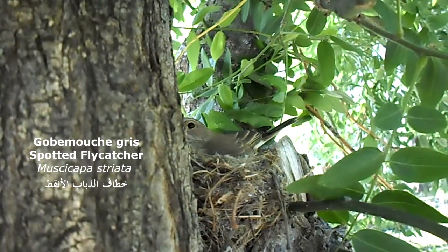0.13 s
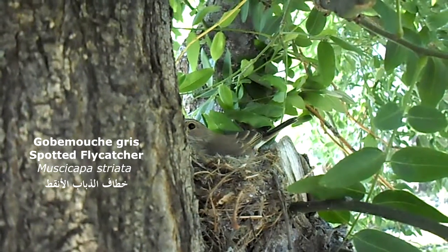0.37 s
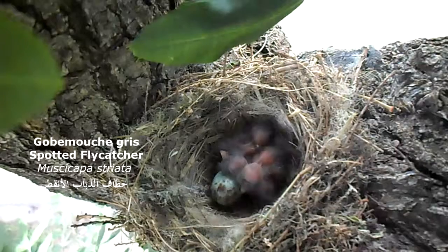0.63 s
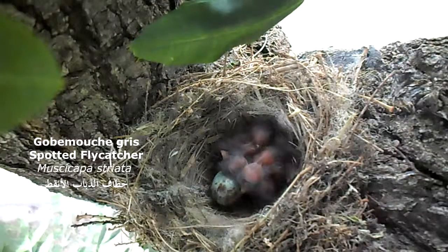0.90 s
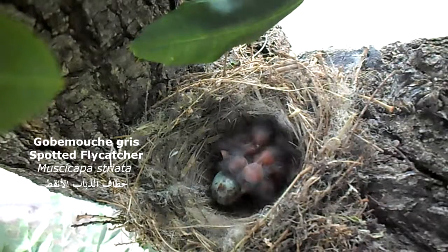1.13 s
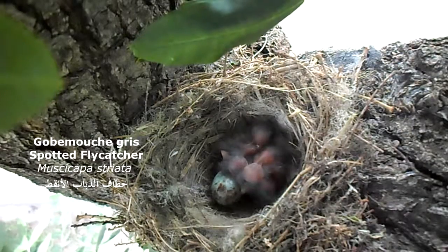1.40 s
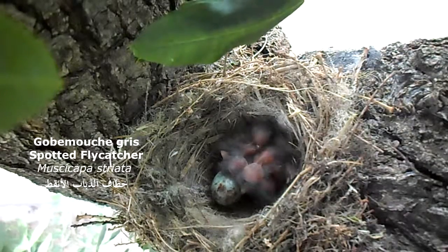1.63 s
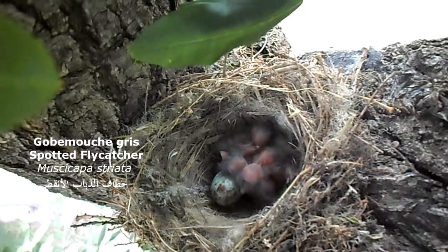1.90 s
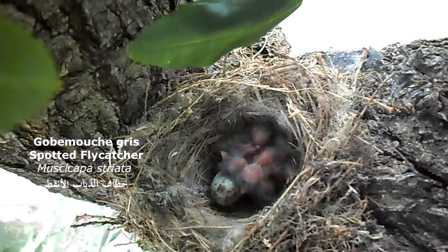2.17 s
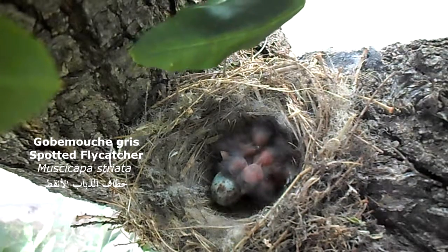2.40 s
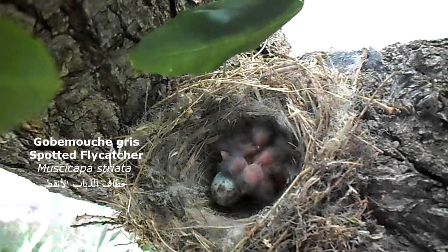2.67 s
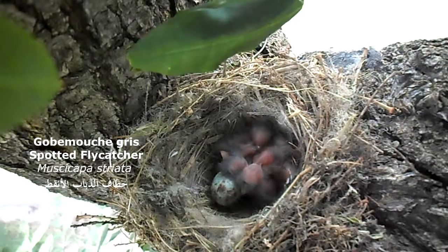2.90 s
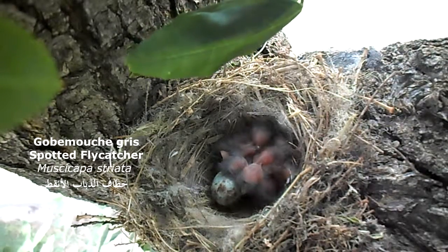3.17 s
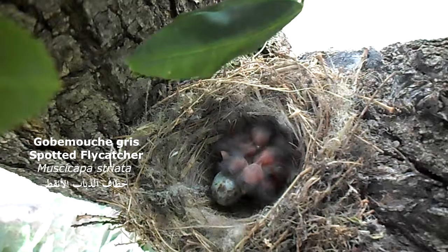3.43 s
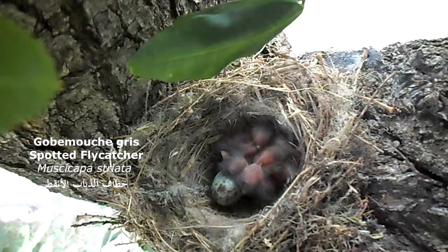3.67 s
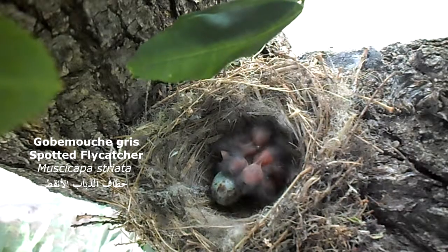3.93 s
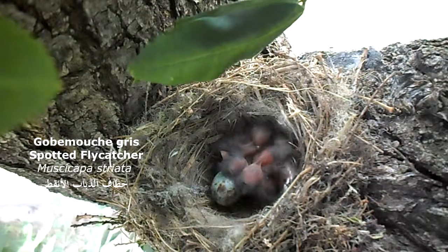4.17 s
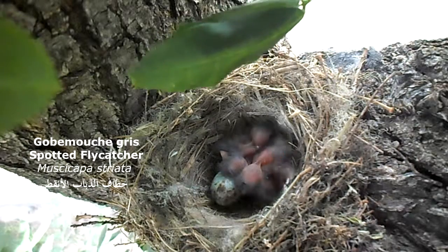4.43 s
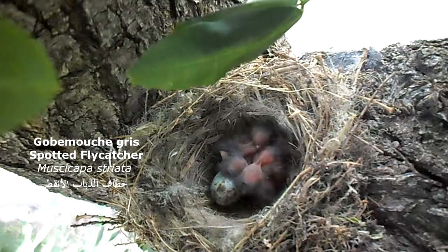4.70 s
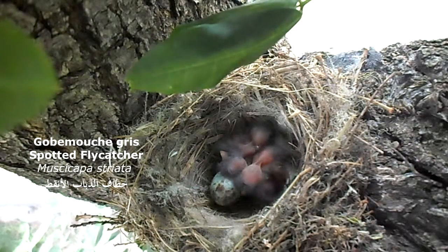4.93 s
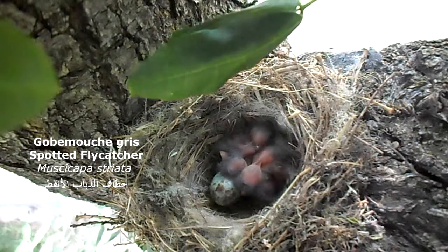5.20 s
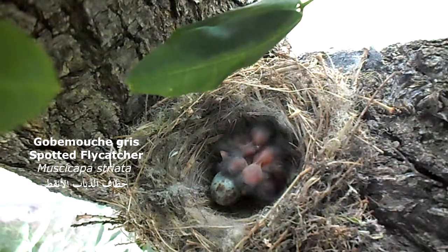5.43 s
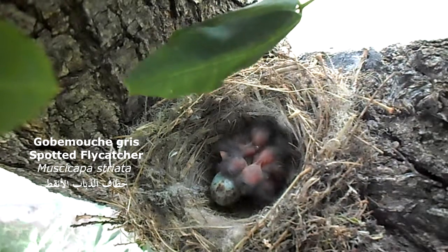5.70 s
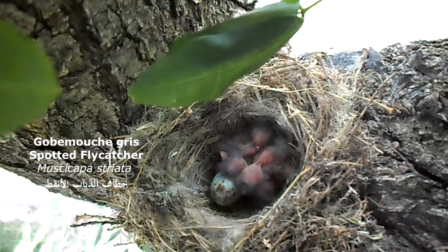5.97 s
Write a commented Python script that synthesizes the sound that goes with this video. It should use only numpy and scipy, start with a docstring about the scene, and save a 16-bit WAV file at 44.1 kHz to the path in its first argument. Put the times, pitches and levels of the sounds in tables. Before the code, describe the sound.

Small birds chirp, trill and seep thinly among trees while low wind buffets the microphone; a brief traffic roar cuts off at the start.

```python
"""Trees around a nest: small birds give thin glides, warbles, buzzy falling calls, trills, slurs and high seeps.
Bird notes are near sines on pitch curves, with scattered echoes from the trees.
Wind (low noise and pressure dips) buffets the microphone over a steady coloured-noise hiss.
Twigs tick (noise puffs) and wood knocks (damped sines) now and then.
A distant traffic roar (noise) with a low drone (wavering sine) fills the first half second and stops abruptly."""
import sys
import numpy as np
from scipy import signal
from scipy.fft import rfft, irfft
from scipy.io import wavfile
from scipy.ndimage import uniform_filter1d

SR = 44100
rng = np.random.default_rng(int(sys.argv[2]) if len(sys.argv) > 2 else 0)


def voltage_ratio(level):
    """Linear amplitude factor for a level in decibels (scalar or array-like)."""
    return 10 ** (np.asarray(level, float) / 20)


def bounce(signal):
    """Save signal as a 16-bit WAV file at the path given by the first command-line argument."""
    frames = np.transpose(np.atleast_2d(signal))
    limited = np.clip(frames, -1, 1)
    pcm = np.round(limited * 32767).astype(np.int16)
    wavfile.write(sys.argv[1], SR, pcm)


N = 268172  # samples


def evened(x):
    """Scales to rms 1."""
    return x / np.sqrt(np.mean(x ** 2) + 1e-20)


def add(mix, start_s, sound):
    """Adds a sound into the mix in place, clipped at the mix's end."""
    part = mix[round(start_s * SR):][:len(sound)]
    part += sound[:len(part)]


def wander(count, hz):
    """Random curve of rms about 1: straight lines between hz random knots a second, 500 at most."""
    knots = rng.standard_normal(int(count * 500 / SR) + 9)
    return np.interp(np.arange(count) * min(hz, 500) / SR, np.arange(len(knots)), knots)


def noise(spectrum, size, patchy_db):
    """Noise of rms 1 from random short-time spectra of a given colour, with drifting patches."""
    hz = np.fft.rfftfreq(size, 1 / SR)
    frames = N // (size // 4) + 5
    real, imag, patches = rng.standard_normal((frames, len(hz), 3)).T
    patches = uniform_filter1d(patches, size=10, axis=0)  # across frequency
    patches = evened(uniform_filter1d(patches, size=8, axis=1))  # across time
    point_hz, point_db = np.transpose(spectrum)
    colour_db = np.interp(np.log(hz + 1), np.log(point_hz + 1), point_db, left=-90, right=-90)
    spectra = (real + 1j * imag) * voltage_ratio(colour_db[:, None] + patchy_db * patches)
    return evened(signal.istft(spectra, nperseg=size, noverlap=size - size // 4)[1][:N])


# Hiss colour. Each row: frequency in Hz, relative density in dB per Hz.
HISS_COLOUR = [(90, -12.5), (150, -1), (250, -8), (500, -9), (800, -13.5), (1300, -19), (2500, -22),
               (3500, -22), (5000, -24.5), (7000, -25), (7700, -21), (8900, -21), (9700, -26),
               (10400, -34.5), (11200, -57)]


def hiss():
    """Steady coloured noise, its level almost still."""
    level_db = -56.5 + 0.043 * wander(N, 2.6)
    return voltage_ratio(level_db) * noise(HISS_COLOUR, size=1024, patchy_db=0.66)


# Wind level curves. Each row: time in seconds, deep buffet level in dB, upper buffet level in dB.
GUSTS = [(0, -44.5, -51), (.5, -52, -52.5), (1.0, -53, -54.5), (1.45, -45, -56), (1.8, -52, -58),
         (2.1, -40, -52), (2.38, -44.5, -52.5), (2.55, -36, -45.5), (2.96, -41, -46.5), (3.12, -41, -53),
         (3.45, -42.5, -48.5), (3.8, -47, -57.5), (4.12, -46.5, -48.5), (4.45, -45, -56),
         (4.74, -46.5, -54), (4.86, -41, -47.5), (5.4, -37, -46.5), (5.65, -39, -50.5), (5.95, -36, -53),
         (6.07, -32.5, -36)]
# Colours of the two layers. Each row: frequency in Hz, relative density in dB per Hz.
DEEP_COLOUR = [(8, -25), (22, 2.5), (45, -6.5), (70, -9), (120, -42)]
UPPER_COLOUR = [(35, 0.5), (65, 1), (100, -4.5), (160, -15), (300, -30), (600, -66)]


def buffets():
    """Lumpy low pressure swings at the microphone: two noise layers lifted by the same eddies."""
    s, deep_db, upper_db = np.transpose(GUSTS)
    t = np.arange(N) / SR
    eddies = wander(N, 24)
    deep = voltage_ratio(np.interp(t, s, deep_db) + 2.5 * eddies) * noise(DEEP_COLOUR, size=8192, patchy_db=0.5)
    upper = voltage_ratio(np.interp(t, s, upper_db) + 2.0 * eddies) * noise(UPPER_COLOUR, size=4096, patchy_db=1)
    return deep + upper


# Sudden wind puffs. Each row: start in seconds, depth of the dip in dB.
PUFFS = [(1.918, -39), (2.679, -37), (2.801, -33), (2.835, -29), (2.932, -31.5), (4.826, -33),
         (4.954, -31.5), (5.782, -33), (6.048, -32)]
PUFF_HALF_WIDTH_S = 0.0029


def puffs():
    """Puffs that suck at the capsule: one pressure dip between two positive shoulders."""
    out = np.zeros(N)
    u = np.arange(SR // 20) / SR / PUFF_HALF_WIDTH_S - 3
    dip = (u ** 2 - 1) * np.exp(-.5 * u ** 2)
    for start_s, db in PUFFS:
        add(out, start_s, voltage_ratio(db) * dip)
    return out


# Traffic roar colour. Each row: frequency in Hz, relative density in dB per Hz.
ROAR_COLOUR = [(90, -32), (150, -3), (200, -5.5), (500, -2), (880, -4), (1400, -1), (1900, -7.5),
               (3200, -15.5), (9000, -22), (11000, -42)]
ROAR_END_S, DRONE_END_S = 0.488, 0.528
DRONE_HZ = 43.13  # mean


def traffic():
    """A grainy noise roar and a drone, a sine wavering in pitch and level, that end abruptly."""
    t = np.arange(N) / SR
    roar = voltage_ratio(-53 + 0.87 * wander(N, 59.6)) * noise(ROAR_COLOUR, size=1024, patchy_db=0.7)
    turns = np.cumsum(DRONE_HZ * (1 + 0.048 * wander(N, 8.8))) / SR
    drone = voltage_ratio(-39.5 + 2.7 * wander(N, 13.0)) * np.sin(2 * np.pi * turns)
    roar_gate = np.clip((ROAR_END_S - t) / 0.0045, 0, 1)
    drone_gate = np.clip((DRONE_END_S - t) / 0.047, 0, 1)
    return roar * roar_gate + drone * drone_gate


# Twig ticks and rustles. Each row: start in seconds, rms before rise and decay in dB, band centre in Hz,
# t60 in seconds.
TICKS = [(.883, -53.5, 5000, 0.098), (1.4913, -41, 4770, 0.01), (1.4965, -45.5, 6000, 0.018),
         (2.378, -48.5, 736, 0.16), (2.398, -56, 4500, 0.34), (2.436, -49, 600, 0.088),
         (2.445, -57, 4500, 0.12), (2.468, -48.5, 785, 0.093), (4.472, -54.5, 4970, 0.18),
         (5.293, -51, 7000, .014)]
TICK_WIDTH, TICK_RISE = 1.26, 0.063  # band width / centre; rise / t60


def ticks():
    """Twig ticks and rustles: decaying puffs of noise in a broad band."""
    out, t = np.zeros(N), np.arange(SR // 8) / SR
    hz = np.fft.rfftfreq(len(t), 1 / SR)
    for start_s, db, centre_hz, t60_s in TICKS:
        band = np.exp(-2 * ((hz / centre_hz - 1) / TICK_WIDTH) ** 2)
        puff = evened(irfft(rfft(rng.standard_normal(len(t))) * band, len(t)))
        rise = np.minimum(t / (TICK_RISE * t60_s), 1)
        add(out, start_s, puff * voltage_ratio(db - 60 * t / t60_s) * rise)
    return out


# Knocks on wood. Each row: start in seconds, level before rise and decay in dB, pitch in Hz.
KNOCKS = [(1.4902, -37.5, 775), (1.8543, -35.5, 2400), (1.9915, -33, 970), (2.4702, -38, 560),
          (5.372, -45, 1770)]
KNOCK_T60_CYCLES = 9.9


def knocks():
    """Knocks on wood: each rings one damped mode, rising over its first cycle."""
    out, t = np.zeros(N), np.arange(SR // 8) / SR
    for start_s, db, mode_hz in KNOCKS:
        cycles = mode_hz * t
        ring = np.sin(2 * np.pi * cycles) * np.minimum(cycles, 1)
        add(out, start_s, voltage_ratio(db - 60 * cycles / KNOCK_T60_CYCLES) * ring)
    return out


ECHO_T60_S, ECHO_RISE_S, ECHO_TURN_HZ = 0.3, 0.011, 4.3


def trees(x):
    """Scattered echoes from trunks and moving leaves: three sparse random tails that take turns."""
    cells = np.arange(100, SR // 2 - 20, 20)  # one tap per 20 samples
    t = np.arange(SR // 2) / SR
    turn = 2 * np.pi * ECHO_TURN_HZ * np.arange(N) / SR
    out = np.zeros(N)
    for k in range(3):
        place, sign = rng.random((len(cells), 2)).T
        taps = np.zeros(SR // 2)
        taps[cells + (place * 20).astype(int)] = np.sign(sign - .5)
        taps *= voltage_ratio(-60 * t / ECHO_T60_S) * np.minimum(t / ECHO_RISE_S, 1)
        share = np.sqrt(2 / 3) * np.cos(turn + 2 * np.pi * k / 3)  # squares sum to 1
        out += signal.fftconvolve(share * x, taps / np.linalg.norm(taps))[:N]
    return out


THROB_HZ, THROB_STROKE_HZ_PER_DB = 205.7, 22


def note(rows, shake_hz, flutter_db, throb_db=0):
    """A near sine on a curve of (s, Hz, dB), shaky in pitch and level; throb_db pulses level and pitch."""
    s, hz, db = np.transpose(rows)
    t = np.arange(s[0], s[-1], 1 / SR)
    beat_hz = THROB_HZ * (1 + 0.213 * wander(len(t), 101))
    beat = np.cos(2 * np.pi * np.cumsum(beat_hz) / SR)
    hz = uniform_filter1d(np.interp(t, s, hz), size=100, mode="nearest")
    hz += shake_hz * wander(len(t), 300)
    # pitch stroke lags the level pulse by about a quarter cycle
    hz += THROB_STROKE_HZ_PER_DB * throb_db * np.roll(beat, round(SR / THROB_HZ / 4))
    db = np.interp(t, s, db) + flutter_db * wander(len(t), 200) + throb_db * beat
    edge = np.clip(np.minimum(t - s[0], s[-1] - t) / 0.0015, 0, 1)
    return edge * voltage_ratio(db) * np.sin(2 * np.pi * np.cumsum(hz) / SR)


# High seeps. Each row: time in seconds, peak level before flutter in dB.
SEEPS = [(.6245, -58), (.6494, -60), (.8365, -59), (.852, -59), (.889, -55), (.9428, -59), (1.21, -56.5),
         (1.2356, -57), (1.2544, -59), (1.5963, -58), (1.618, -60), (2.2159, -63), (2.59, -63),
         (2.411, -54.5), (2.427, -61), (2.461, -60.5), (3.5785, -48.5), (3.5924, -55), (3.719, -54),
         (3.727, -58), (3.889, -57), (3.928, -61), (3.95, -66), (4.6074, -59.5), (4.856, -61), (5.811, -61)]
SEEP_HZ, SEEP_SPREAD_HZ, SEEP_S = 8676, 54, 0.022


def seeps():
    """Short high notes of steady mean pitch, each drawn near one frequency."""
    out = np.zeros(N)
    for s, db in SEEPS:
        hz = SEEP_HZ + SEEP_SPREAD_HZ * rng.standard_normal()
        rows = [(0, hz, db - 5), (0.23 * SEEP_S, hz, db), (SEEP_S, hz, db - 13)]
        add(out, s - .001, note(rows, shake_hz=49.7, flutter_db=0.5))
    return out


def sing(shape, phrase):
    """Repeats one falling note shape at each start and level of a phrase."""
    out = np.zeros(N)
    for start_s, db in phrase:
        add(out, start_s, voltage_ratio(db) * note(shape, shake_hz=16, flutter_db=1.6))
    return out


# Slur note shape. Each row: time after start in seconds, pitch in Hz, level re the phrase's level in dB.
SLUR_NOTE = [(0, 3560, -8), (.008, 3170, -1.5), (.02, 2815, 2), (.027, 2620, -6), (.045, 2320, -6),
             (.062, 2170, -8), (.075, 2100, -12)]
# Slur phrase. Each row: start in seconds, level in dB.
SLUR_PHRASE = [(5.607, -52.5), (5.722, -50.5), (5.84, -51), (5.972, -50)]


def slurs():
    """A bird slurring down in a slow row of notes."""
    return sing(SLUR_NOTE, SLUR_PHRASE)


# Trill note shapes. Each row: time after start in seconds, pitch in Hz, level re the phrase's level in dB.
FIRST_NOTE = [(0, 4165, -19), (.006, 3580, -3.5), (.011, 3480, -2), (.015, 3095, -6.5), (.02, 2700, -13.5),
              (.028, 2545, -17), (.042, 2120, -20)]
SECOND_NOTE = [(0, 3920, -8), (.004, 3940, -8.5), (.009, 3820, -1.5), (.014, 3470, -2.5),
               (.019, 3000, -6.5), (.025, 2500, -10)]
# Trill phrases. Each row: start in seconds, level in dB.
FIRST_TRILL = [(1.953, -53), (2.022, -49.5), (2.091, -47.5), (2.165, -48), (2.241, -47.5), (2.318, -47),
               (2.395, -48.5), (2.473, -50.5)]
SECOND_TRILL = [(3.638, -62), (3.712, -52), (3.802, -49.5), (3.885, -51), (3.98, -50), (4.084, -51.5),
                (4.192, -53), (4.29, -52), (4.42, -54), (4.533, -54), (4.648, -54), (4.771, -51)]


def trills():
    """A farther bird: two trills, each repeating its own short falling note."""
    return sing(FIRST_NOTE, FIRST_TRILL) + sing(SECOND_NOTE, SECOND_TRILL)


# Buzzy falling calls. Each row: start in seconds, length in seconds, upper voice first pitch in Hz,
# last pitch in Hz, upper voice peak level before flutter and throb in dB.
BUZZES = [(.29, 0.12, 5640, 5060, -65), (0.637, 0.13, 7030, 5750, -53.5), (3.9, .08, 6010, 4930, -62.5),
          (3.973, .11, 4780, 4090, -63), (4.238, 0.14, 6690, 6190, -53.5), (5.194, .07, 4470, 3070, -65)]
BUZZ_BEND = 1.9  # power of time: the fall in pitch speeds up


def buzzes():
    """Two throbbing voices fall together, the lower one drawing away in pitch and gaining level."""
    out = np.zeros(N)
    at = np.linspace(0, 1, 12)
    swell_db = np.interp(at, [0, 0.31, 1], [-12.5, 0, -7.5])
    lower_ratio, lower_db = .925 - 0.053 * at, -4 + 3.5 * at  # re the upper voice
    for start_s, length_s, first_hz, last_hz, db in BUZZES:
        hz = first_hz + (last_hz - first_hz) * at ** BUZZ_BEND
        for ratio, voice_db in (1, 0), (lower_ratio, lower_db):
            rows = np.c_[length_s * at, ratio * hz, db + swell_db + voice_db]
            add(out, start_s, note(rows, shake_hz=80, flutter_db=2.5, throb_db=5))
    return out


# One table per warble. Each row: time in seconds, pitch in Hz, level before flutter and throb in dB.
WARBLES = [
    [(1.186, 2650, -66), (1.196, 2960, -60), (1.201, 3340, -56), (1.21, 2950, -55), (1.219, 2750, -62)],
    [(1.246, 3900, -58), (1.253, 4600, -61), (1.27, 4600, -53), (1.28, 3910, -52), (1.291, 3180, -62),
     (1.31, 3330, -57), (1.333, 3870, -59)],
    [(2.5, 2860, -58), (2.518, 3350, -60), (2.528, 3050, -56.5), (2.54, 2650, -71)],
    [(4.404, 5470, -60), (4.416, 5300, -57), (4.432, 5540, -49.5), (4.448, 4800, -55), (4.462, 4250, -67),
     (4.474, 3450, -59), (4.485, 2800, -64)],
    [(4.54, 4800, -62), (4.55, 5500, -54), (4.56, 5680, -50.5), (4.578, 4920, -61), (4.594, 3570, -70)],
    [(4.758, 3510, -56), (4.77, 5330, -54.5), (4.784, 5320, -55), (4.8, 3730, -49), (4.81, 3650, -59),
     (4.822, 3600, -68)],
]


def warbles():
    """Throbbing notes that turn in pitch."""
    out = np.zeros(N)
    for rows in WARBLES:
        add(out, rows[0][0], note(rows, shake_hz=55, flutter_db=2.5, throb_db=2.5))
    return out


# Short gliding whistles. Each row: start in seconds, length in seconds, first pitch in Hz, last pitch in Hz,
# peak level before flutter and throb in dB.
GLIDES = [(.338, .012, 4250, 4050, -60), (0.484, 0.028, 3680, 3050, -61), (0.703, .014, 3700, 3870, -70),
          (.756, 0.022, 5300, 4650, -61), (0.776, 0.016, 4700, 3700, -60), (0.842, 0.031, 6220, 5850, -61),
          (0.868, .02, 5750, 5000, -57.5), (1.134, .038, 4150, 2980, -63), (1.274, 0.016, 4660, 4170, -63),
          (1.295, .026, 5630, 4600, -62), (1.506, .011, 5700, 5600, -62), (1.524, 0.02, 4600, 4500, -60),
          (1.542, 0.028, 3030, 3500, -62.5), (1.737, .03, 5140, 5400, -66), (2.268, .025, 4200, 4450, -63),
          (2.84, 0.059, 5300, 3490, -65), (2.907, 0.032, 3490, 3850, -64), (3.42, .038, 5550, 4900, -64),
          (3.78, 0.044, 4720, 4500, -62), (3.826, .06, 4450, 4600, -67), (4.06, 0.011, 2960, 3040, -55.5),
          (4.068, 0.026, 3220, 3670, -60), (4.098, .012, 3100, 3020, -57), (4.138, 0.011, 2500, 2510, -60),
          (4.403, .022, 5830, 5560, -57), (4.74, .02, 6150, 6170, -61), (4.955, .019, 3710, 4320, -65),
          (4.977, 0.038, 5200, 5450, -67), (4.981, .03, 3750, 2850, -67), (5.023, 0.0196, 4300, 3500, -63),
          (5.039, .018, 3580, 2730, -58.5), (5.227, .016, 3200, 3080, -64), (5.41, 0.032, 3650, 3850, -67),
          (5.458, 0.03, 5260, 5300, -62.5), (5.496, 0.038, 4200, 2740, -64)]


def glides():
    """Thin throbbing whistles on a straight glide, loudest just past the middle."""
    out = np.zeros(N)
    at = np.array([0, .55, 1])
    for start_s, length_s, first_hz, last_hz, db in GLIDES:
        hz = first_hz + (last_hz - first_hz) * at
        rows = np.c_[length_s * at, hz, db + np.array([-4, 0, -4])]
        add(out, start_s, note(rows, shake_hz=55.3, flutter_db=2.0, throb_db=5.0))
    return out


NEAR_ECHO_DB, FAR_ECHO_DB, SLUR_ECHO_DB = -6.5, -3.5, -6.5


def birds():
    """A near warbler and seeps, a farther triller and a slurring bird, each with its share of echo."""
    near = seeps() + buzzes() + warbles() + glides()
    far, slurred = trills(), slurs()
    echo_send = voltage_ratio(NEAR_ECHO_DB) * near + voltage_ratio(FAR_ECHO_DB) * far + voltage_ratio(SLUR_ECHO_DB) * slurred
    return near + far + slurred + trees(echo_send)


def scene():
    """Birds with their echoes over hiss, wind, traffic, ticks and knocks; one channel."""
    wind = buffets() + puffs()
    return (hiss() + wind + traffic() + ticks() + knocks() + birds())[None]


def band_limit(x):
    """A steep low-pass at the top of the band."""
    return signal.sosfilt(signal.butter(12, 11130, fs=SR, output="sos"), x)


def record(dry):
    """Limits the band with a steep linear-phase low-pass at 10950 Hz."""
    edge = signal.firwin(255, 10950, window=("kaiser", 8), fs=SR)
    mix = signal.oaconvolve(dry, edge[None], "same")
    return band_limit(mix)


dry = scene()
out = record(dry)
bounce(out)
```